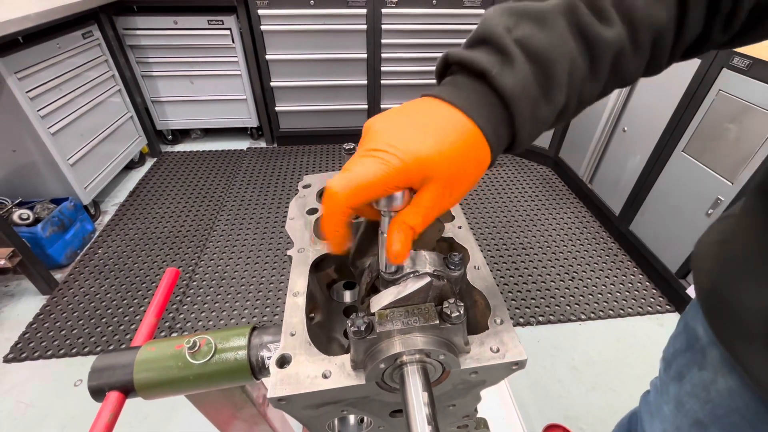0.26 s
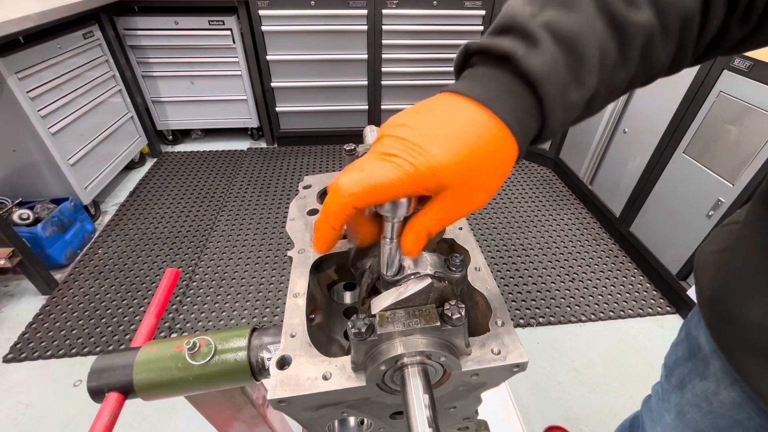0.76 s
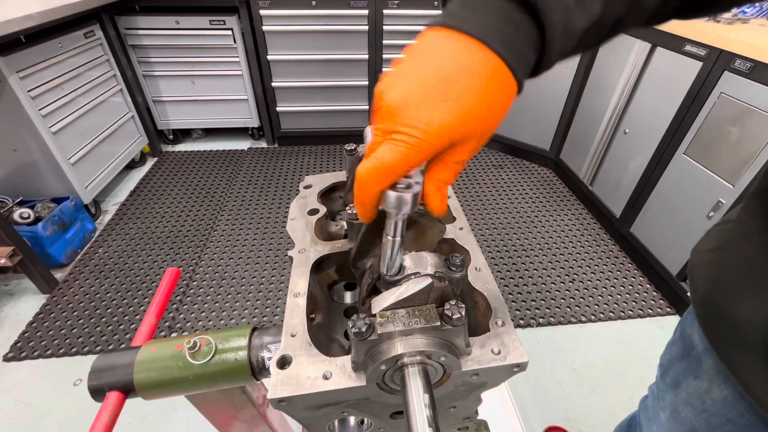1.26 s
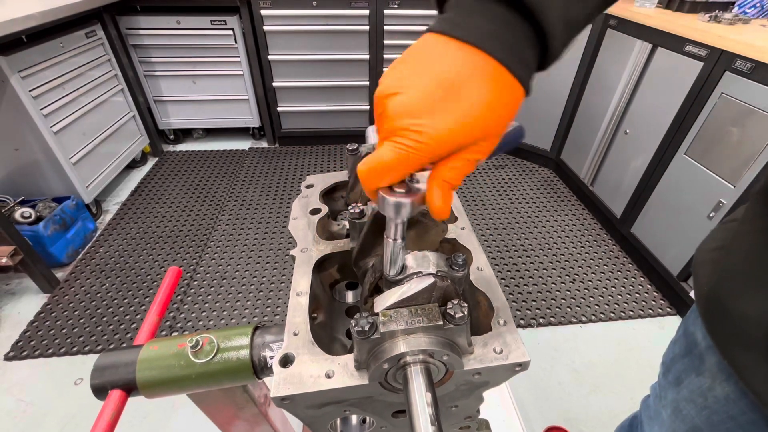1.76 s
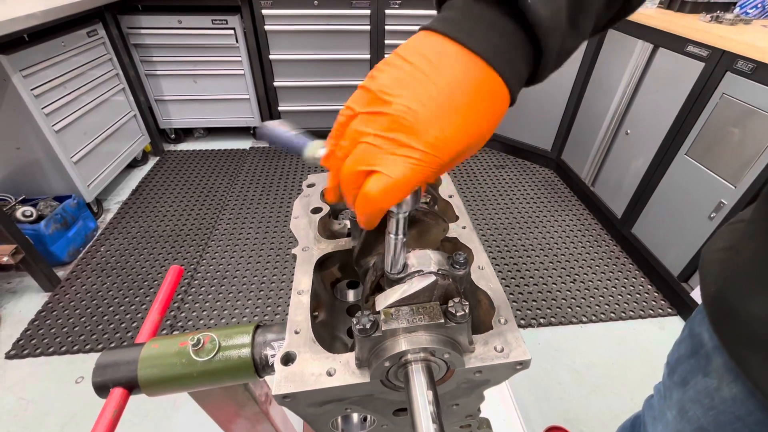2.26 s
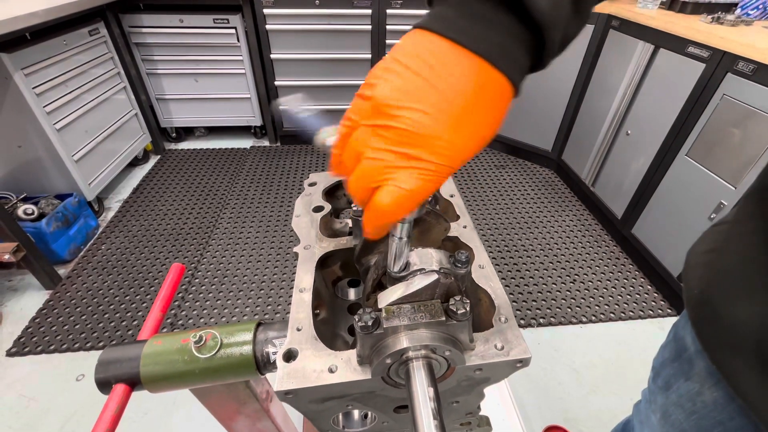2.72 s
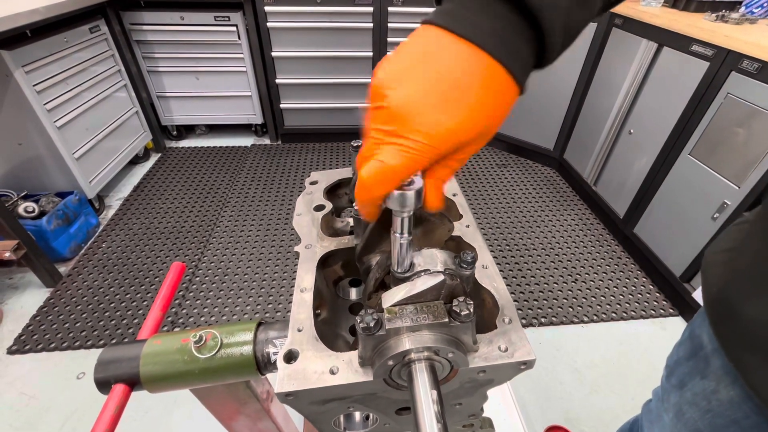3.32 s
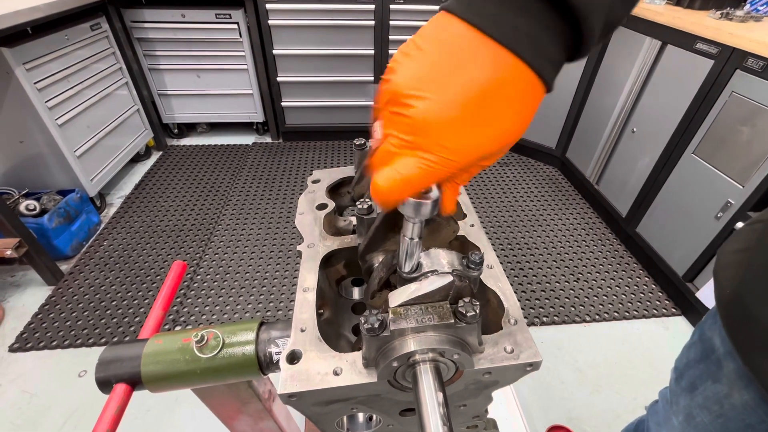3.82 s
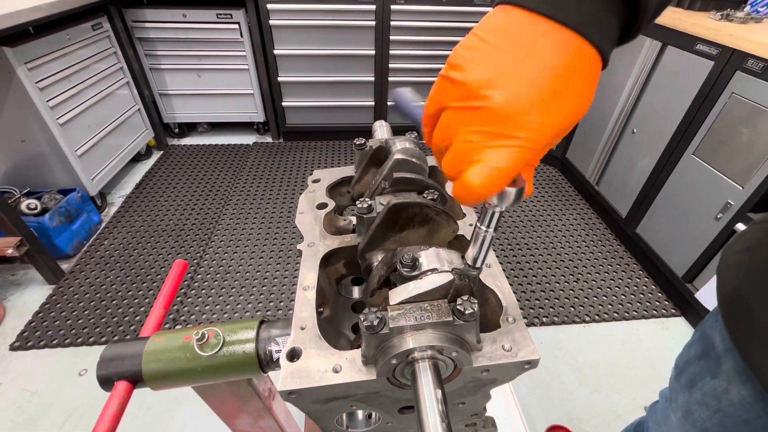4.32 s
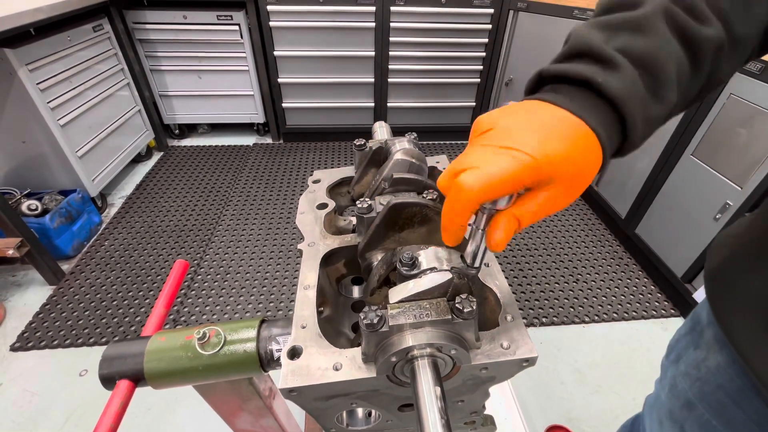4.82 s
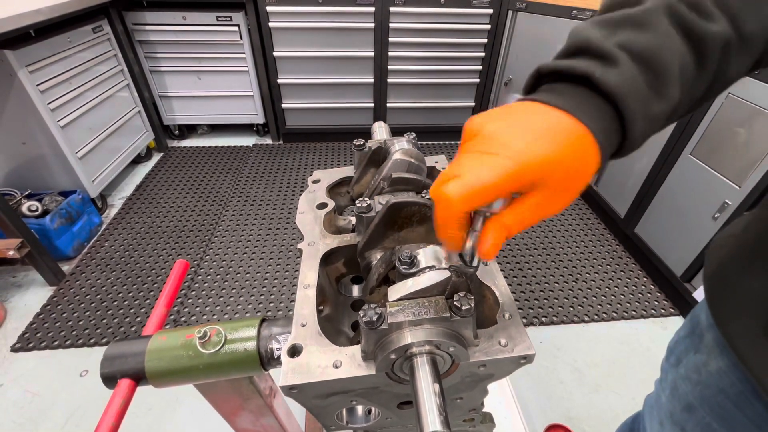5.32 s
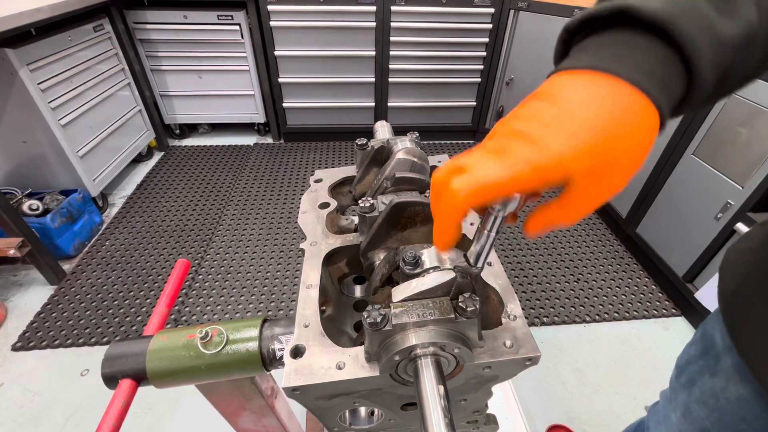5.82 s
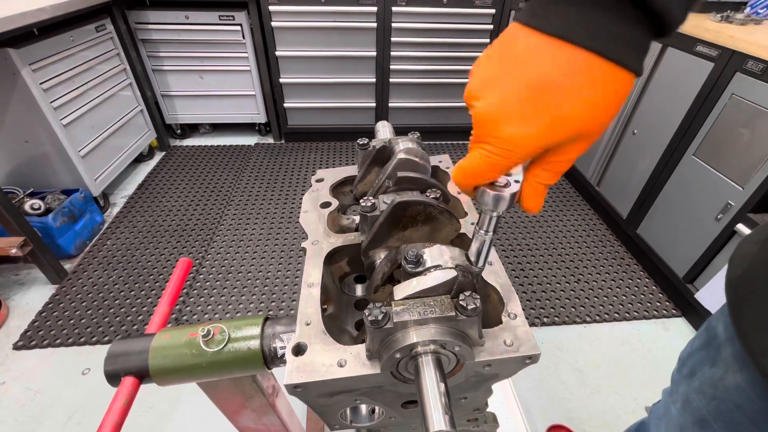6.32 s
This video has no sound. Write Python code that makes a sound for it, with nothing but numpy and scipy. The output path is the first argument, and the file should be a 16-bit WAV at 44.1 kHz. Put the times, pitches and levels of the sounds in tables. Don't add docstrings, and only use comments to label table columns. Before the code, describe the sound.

Close up in a hard-walled workshop, a hand ratchet works on engine nuts. Eight quick, loud zips of tiny metallic clicks come first, with a dull bump beneath. Softer, slower strokes and hesitant single ticks follow, then another run of brisk flicks, ending in steady strokes. A low fan drone continues throughout. Stereo, with the tool brighter on the right and the room echoing more on the left.

```python
import sys
import numpy as np
from scipy import signal
from scipy.fft import rfft, irfft
from scipy.io import wavfile

SR = 44100
rng = np.random.default_rng(int(sys.argv[2]) if len(sys.argv) > 2 else 0)


def unload_wav(signal):
    wavfile.write(
        sys.argv[1],
        SR,
        np.round(np.clip(np.atleast_2d(signal).T, -1, 1) * 32767).astype(np.int16),
    )


def gain_from_db(level_db):
    decades = np.asarray(level_db, float) / 20
    return 10 ** decades


N = 289781

# [start t/s, length/s, peak level/dB, lean from start to end/dB, favoured f/Hz]
QUICK_STROKES = [(.0079, .027, -22, 3, 5430), (.1348, .024, -19.5, 0, 8000),
                 (0.255, 0.026, -21, -0.3, 8160), (0.3633, 0.03, -21.5, 4, 7400),
                 (0.487, 0.023, -20, 1.5, 5110), (0.5919, 0.033, -22.5, 3, 3000),
                 (0.718, 0.034, -22, -2, 4987), (0.8318, 0.025, -19.5, 1, 3000),
                 (1.4484, .045, -29, 0, 7400), (1.5754, 0.01202, -30.5, -3, 14960),
                 (4.693, 0.0271, -27.5, -5, 8590), (4.8345, .038, -24, -3, 8140),
                 (4.969, 0.02173, -21, -3, 8200), (5.0958, 0.027, -21.5, -1, 4543),
                 (5.2215, 0.02817, -23, 2.2, 5080), (5.3559, .039, -24, -0.3, 8910),
                 (5.4844, 0.032, -24, 1.5, 3000), (5.618, 0.039, -24, -2.2, 8150)]
STEADY_STROKES = [(0.953, 0.011, -26, -0.5, 7400), (1.285, 0.055, -30.5, 0, 3000),
                  (2.5824, .056, -31, 0, 14900), (2.739, 0.047, -32.5, -1, 11250),
                  (2.8867, 0.034, -29.5, 0.2, 11110), (3.0259, 0.041, -30, -2.5, 11050),
                  (3.1686, 0.045, -30.5, -0.5, 6100), (3.313, 0.038, -30.5, 1.5, 8150),
                  (3.4514, 0.045, -28, 1.2, 7400), (3.5974, 0.05, -27.5, 0.5, 6710),
                  (3.7351, 0.042, -27, -0.2, 6100), (3.8677, 0.048, -29, 1, 6100),
                  (4.0111, 0.0355, -28, 1.5, 6100), (4.1475, 0.01715, -28, -1.5, 3320),
                  (4.5396, 0.014, -29, 3.5, 3000), (5.751, 0.041, -29.5, 0.3, 8170),
                  (6.062, 0.063, -27.5, -3.5, 14980), (6.2469, 0.046, -28, 0.5, 9130),
                  (6.397, 0.051, -28.5, -2, 3000), (6.542, 0.025, -27.5, 1, 3000)]
HESITANT_STROKES = [
    (1.0715, 0.0019, -27.5, 1.5, 7400),
    (1.6924, 0.046, -30.5, 2.7, 6700),
    (1.8263, .015, -28, 1.8, 6100),
    (1.891, .016, -37.5, 2.5, 9070),
    (2.0854, 0.041, -28.5, -2, 13920),
    (2.2404, 0.012, -33, -5.8, 12450),
    (2.3852, 0.0267, -32.5, -3.3, 14860),
    (4.3164, .002, -28, -1.3, 3689),
    (4.3548, 0.0022, -25.5, -1.2, 8970),
    (4.4409, 0.0019, -30, 2.5, 3000),
]


def at_hz(points, hz, index=1):
    points = np.array(points)
    return np.interp(np.log(hz), np.log(points[:, 0]), points[:, index])


def rms_one(x):
    return x / np.sqrt(np.mean(x ** 2))


def ring(clicks, hz, t60):
    radius, turn = gain_from_db(-60 / (t60 * SR)), 2 * np.pi * hz / SR
    return signal.lfilter([0, np.sin(turn)], [1, -2 * radius * np.cos(turn), radius * radius], clicks + 1e-18)


def train(s, sizes):
    return np.bincount(np.clip((s * SR).astype(int), 0, N - 1), sizes, N)


def stereo_noise(hz, shape):
    # [f/Hz, left-right likeness 0 to 1]
    likeness = [(30, 0.93), (60, 0.8), (130, 0.91), (280, 1), (600, 0.32), (1200, 0), (4000, 0)]
    mid, side = rfft(rng.standard_normal((2, N))) * shape
    alike = np.clip(at_hz(likeness, hz), -1, 1)
    both = np.sqrt(1 + alike) * mid
    apart = np.sqrt(1 - alike) * side * [[1], [-1]]
    return rms_one(irfft(both + apart, N))


def fan():
    # [f/Hz, level/dB per Hz]
    air_curve = [(15, -49), (48, -25.5), (90, -10.5), (230, -7), (270, -15), (330, -3), (520, -12.5),
                 (800, -9.5), (850, -16.5), (1330, -24.5), (2220, -29), (2610, -20.5), (2910, -28.5),
                 (4500, -30.5), (10500, -41.5), (16000, -52)]
    # [f/Hz, width/Hz, level/dB]
    resonances = [(75.6, 7.4, -17.5), (94.7, 5.5, -13), (115.2, 17.5, -7.5), (135, 13.5, -11.5),
                  (152, 5.7, -28.5), (196, 4.7, -6.5), (216.3, 6.7, 3.5), (242, 7.7, -9), (296.7, 8.6, -5),
                  (321, 11.6, -4), (348.2, 6.1, -5), (397, 3, -10.5), (408.7, 4.4, -7.5), (428, 9.4, -4.5),
                  (457.8, 19.3, -9.5), (497, 15, -9), (504.7, 9.4, -12.5), (668, 6.7, -15.5),
                  (694.7, 21, -15.5), (713, 18, -27), (786.4, 23.4, -11.5), (780, 15, -24)]
    hz = np.maximum(np.fft.rfftfreq(N, 1 / SR), 1)
    air = gain_from_db(-47.5) * stereo_noise(hz, gain_from_db(at_hz(air_curve, hz)))
    power = 0
    for centre_hz, width_hz, peak_db in resonances:
        power = power + gain_from_db(2 * peak_db) / (1 + (2 * (hz - centre_hz) / width_hz) ** 2) ** 2
    drone = gain_from_db(-47.5) * stereo_noise(hz, np.sqrt(power))
    return (air + drone) * gain_from_db([[-.5], [.5]])


def grip_at(s):
    # [t/s, treble tilt/dB per octave, left direct level/dB]
    grip = [(.02, -0.1, -5), (.4, -1, -2.5), (.96, 3.5, -8), (1.1, -5, -0.5), (1.5, -3.5, -11),
            (1.83, -0.5, -8), (2.01, -12.5, -5), (2.1, .1, -11), (2.6, -4.5, -6.5), (2.8, -3.5, -8),
            (3.3, -1.9, -7.5), (4.15, -0.8, -6.5), (4.32, -6, -8.5), (4.55, 5, -4.5), (4.85, -2, -6),
            (5.77, -0.5, -3), (6.08, -2.7, -11), (6.5, -0.3, -5.5)]
    when, tilt_points_db, left_points_db = np.transpose(grip)
    tilt_db = np.interp(s, when, tilt_points_db)
    left_db = np.interp(s, when, left_points_db)
    low_db = -1.3 + 0.56 * tilt_db
    strokes = np.concatenate([QUICK_STROKES, STEADY_STROKES, HESITANT_STROKES])
    middle_s = strokes[:, 0] + strokes[:, 1] / 2
    nearest = np.abs(s[:, None] - middle_s).argmin(axis=1)
    return tilt_db, left_db, low_db, strokes[nearest, 4]


def teeth():
    # [t/s, peak level/dB]
    first_nut = [(0.0519, -20), (0.2911, -31.5), (0.3514, -29), (0.4032, -19), (1.0328, -33),
                 (1.0996, -44.5), (1.4306, -31), (1.6359, -32), (1.7504, -44), (1.7692, -30), (1.808, -34),
                 (2.0042, -42), (2.0305, -32.5), (2.1389, -26), (2.1548, -34), (2.187, -32), (2.526, -43),
                 (2.555, -37), (2.568, -22.5), (2.7278, -33), (2.8031, -28), (2.9364, -30), (3.0878, -46),
                 (3.2293, -24), (3.3576, -25), (3.3931, -35), (3.5115, -33), (3.57, -33), (3.9545, -36),
                 (4.1891, -36)]
    # [t/s, peak level/dB]
    second_nut = [(4.3813, -46), (4.4525, -25.5), (4.5019, -31), (4.563, -45), (4.7804, -37), (4.9991, -35),
                  (5.3175, -40), (5.4798, -27), (5.7164, -30), (5.7975, -38), (5.8457, -33), (5.92, -37),
                  (5.9388, -53), (6.0303, -29), (6.0412, -34), (6.126, -30), (6.2986, -27.5),
                  (6.3189, -23.5), (6.329, -32), (6.5321, -26)]
    # [time per tooth/ms, arch of the middle above the ends/dB, softer at first touch/dB]
    paces = [
        (2.4, 4, 4),
        (3.3, 1.46, -2.5),
        (6, -0.3, -2),
    ]
    # [t before it/s, peak level/dB]
    slack = [
        (.007, -40),
        (.015, -45),
    ]
    crest_db, uneven, scatter_db, slack_scatter_db = 5.5, .17, 2.0, 5
    windup = 1 + .5 * np.exp(-np.arange(30) / 2)
    drops = [np.concatenate([first_nut, second_nut])]
    kinds = [QUICK_STROKES, STEADY_STROKES, HESITANT_STROKES]
    for strokes, (tooth_ms, arch_db, takeup_db) in zip(kinds, paces):
        for start, length, peak_db, lean_db, _ in strokes:
            late, strong = rng.standard_normal((2, 30)).clip(-1.4, 1.4)
            gaps = tooth_ms / 1000 * np.exp(uneven * late) * windup
            along = (np.cumsum(gaps) - gaps[0]) / length
            early_db = peak_db - arch_db - lean_db
            late_db = peak_db - arch_db + lean_db
            curve_db = [early_db - takeup_db, early_db, peak_db, late_db]
            level_db = np.interp(along, [0, .12, .5, .83], curve_db) + crest_db + scatter_db * strong
            drops.append(np.c_[start + along * length, level_db][along <= 1.03])
            if length > .02:
                for k, (early_s, slack_db) in enumerate(slack, start=1):
                    click_s = start - early_s * (1 + uneven * late[-k])
                    drops.append([(click_s, slack_db + slack_scatter_db * strong[-k])])
    drops = np.concatenate(drops)
    return drops[drops[:, 0] > .005].T


def ratchet():
    # [f/Hz, right level/dB, left level/dB, t60/s]
    head = [(1200, -43, -18, 0.0048), (2147, -27.5, -7, 0.0093), (3000, -37, -26, 0.0023),
            (4110, -7, -12.5, 0.0024), (4805, -2, 0, 0.0021), (6100, 3.5, 5.5, 0.0023),
            (7400, 2, -62, 0.0014), (9080, -0.5, -1.5, 0.0016), (10385, 3.5, 5.5, 0.0033),
            (12100, 2, 9.5, 0.0014), (13240, 4.5, -18, 0.0029), (14770, 4, -6, 0.0042),
            (14750, -2, 10.5, 0.0015)]
    # [f/Hz, level/dB, t60/s]
    shank = [(2470, -29, .06), (2540, -29, .06), (3300, -34, .04), (4750, -27, .05), (7400, -29, .04),
             (8400, -29, .04), (10480, -26, .05), (10620, -28, .05), (13600, -28, .03)]
    colour_db, favour_db, graze_db, bounce_db = 2.5, 4.0, -6.0, -4.5
    lag_s = .00023
    s, level_db = teeth()
    tilt_db, left_db, low_db, favoured_hz = grip_at(s)
    hit_s = s[:, None] + [-.0007, -.0002, .0002] + rng.random((len(s), 3)) * [.0004, .0001, .0008]
    contact_db = np.array([graze_db, 0, bounce_db]) + rng.standard_normal((len(s), 3)) * [3, 0, 3]
    colour = rng.standard_normal((4, len(s), 3, len(head)))
    out = np.zeros((2, N))
    for k, (hz, right_gain_db, left_gain_db, t60) in enumerate(head):
        struck_db = level_db - 10 + tilt_db * np.log2(hz / 11000) + low_db * (hz < 3100)
        struck_db += favour_db * (np.exp(-(np.log2(hz / favoured_hz) / 0.17) ** 2) - .15)
        smear_s = .00045 * colour[3, ..., k].clip(-2, 2) * np.sqrt(6000 / hz)
        polarity = np.sign(colour[2, ..., k - 1])
        for side, gain_db in enumerate([left_gain_db + left_db, right_gain_db]):
            spread_db = colour_db * (1.11 * colour[2, ..., k] + 0.63 * colour[side, ..., k])
            sizes = gain_from_db((struck_db + gain_db)[:, None] + contact_db + spread_db) * polarity
            arrival_s = hit_s + smear_s + lag_s * side
            out[side] += ring(train(arrival_s.ravel(), sizes.ravel()), hz, t60)
    for hz, gain_db, t60 in shank:
        free_db = 11.0 * np.exp(-(np.log2(hz / favoured_hz) / 0.21) ** 2)
        for side in range(2):
            sizes = gain_from_db(level_db + gain_db + free_db - 5.0) * rng.standard_normal(len(s))
            out[side] += ring(train(s, sizes), hz, t60)
    return signal.sosfilt(signal.butter(2, 900, "high", fs=SR, output="sos"), out)


def workshop(x):
    # [f/Hz, t60/s, level/dB]
    shop = [(1500, 0.37, -43.5), (3000, 0.37, -31.5), (5400, 0.28, -41), (8930, 0.32, -37),
            (13500, 0.31, -50)]
    bench_db, bench_t60_s, left_db, swing_s = -34, .04, 4.5, .012
    t = np.arange(SR // 2) / SR
    bench = gain_from_db(bench_db - 60 * t / bench_t60_s) * (t > .0015)
    edges = 250 * 2 ** np.arange(0, 6.6, .7)
    white = rng.standard_normal((2, 6, 2, len(t)))
    echo = 0
    for k, (low, high) in enumerate(zip(edges, np.minimum(edges[1:], .45 * SR))):
        band = signal.sosfilt(signal.butter(2, [low, high], "band", fs=SR, output="sos"), white[k % 2])
        hz = np.sqrt(low * high)
        onset = np.clip((t - .002) / 0.0016, 0, 1)
        tail = gain_from_db(at_hz(shop, hz, index=2) - 60 * t / at_hz(shop, hz)) * onset
        echo = echo + band * (tail + bench)
    steps = rng.standard_normal((6, 1000))
    swing = np.arange(N) / SR / swing_s
    facing = np.array([np.interp(swing, np.arange(1000), row) for row in steps])
    facing /= np.sqrt(np.sum(facing ** 2, axis=0))
    placed = (x * facing)[:, None]
    return signal.oaconvolve(placed, echo * gain_from_db([[left_db], [0]]), axes=2).sum(axis=0)[:, :N]


def bump():
    # [t/s, peak level/dB]
    thuds = [
        (.088, -36),
        (.097, -31),
    ]
    # [f/Hz, level/dB, t60/s]
    stand = [(393.7, 0.5, 0.068), (525, 0.5, 0.034), (695, -8, 0.041), (989, -1, 0.0056),
             (1540, -0.5, 0.0038)]
    s, peak_db = np.transpose(thuds)
    rings = sum(ring(train(s, gain_from_db(peak_db + gain_db)), hz, t60) for hz, gain_db, t60 in stand)
    return signal.sosfilt(signal.butter(2, [260, 2100], "band", fs=SR, output="sos"), rings)


def scene():
    drone, tool, knock = fan(), ratchet(), bump()
    echoes = workshop(tool[1] + 1.6 * knock)
    return tool + knock + echoes + drone


def roll_off(x):
    return signal.sosfilt(signal.butter(12, 16970, fs=SR, output="sos"), x)


def record(dry):
    # [f/Hz, width/Hz, level/dB]
    dips = [(2713, 147, -3), (11700, 300, -1)]
    overload = 0.39
    hz = np.fft.rfftfreq(N, 1 / SR)
    response_db = np.interp(hz, [15750, 15900, 16600, 16900], [0, -24, -30, -70])
    for centre_hz, width_hz, dip_db in dips:
        response_db = response_db + dip_db * np.exp(-((hz - centre_hz) / width_hz) ** 2)
    rounded = overload * np.tanh(dry / overload)
    mix = irfft(rfft(rounded) * gain_from_db(response_db), N)
    return roll_off(mix)


dry = scene()
out = record(dry)
unload_wav(out)
```